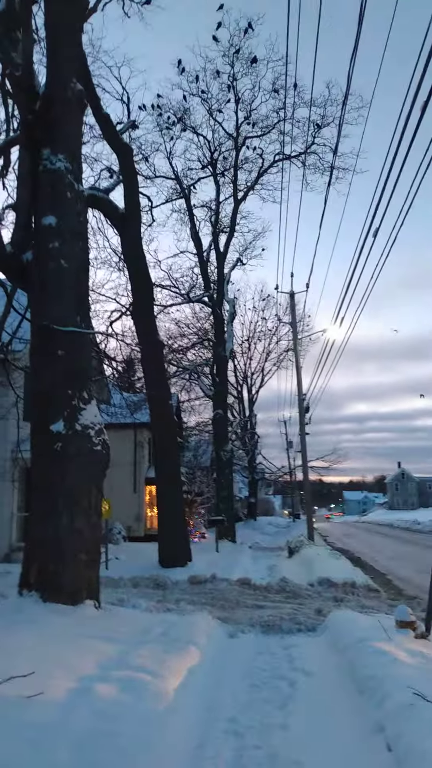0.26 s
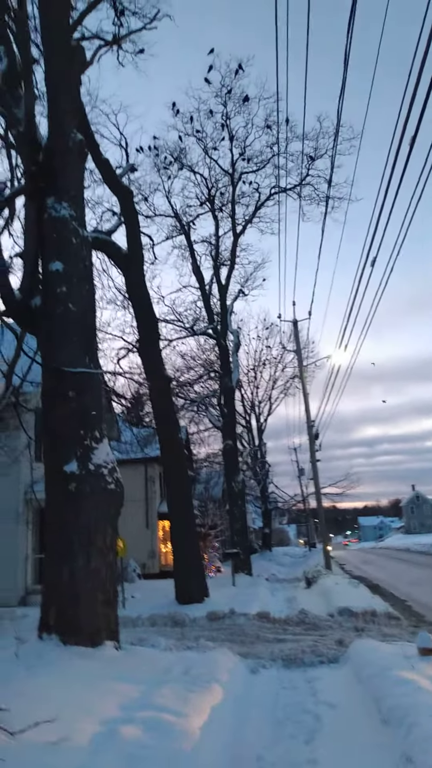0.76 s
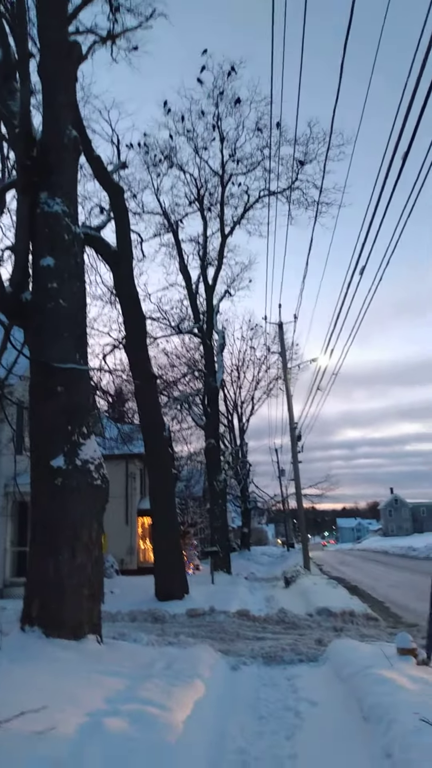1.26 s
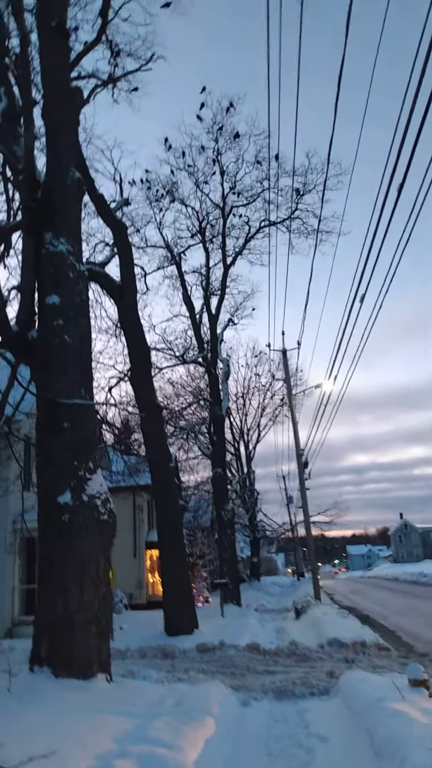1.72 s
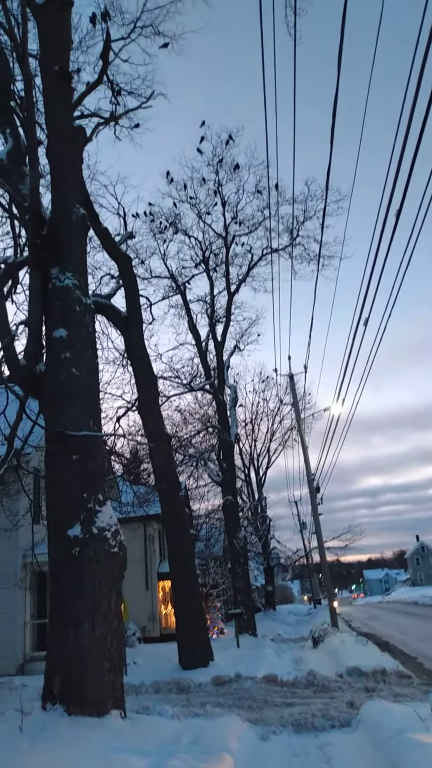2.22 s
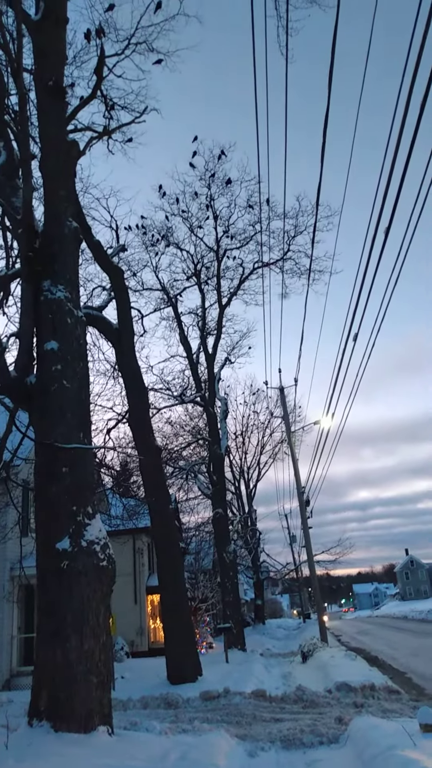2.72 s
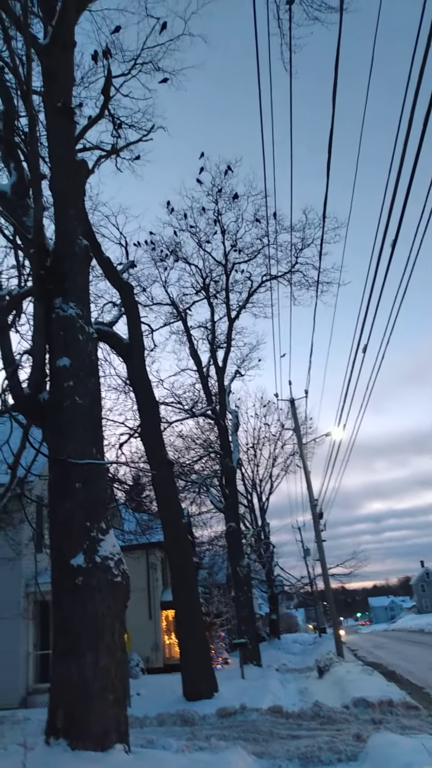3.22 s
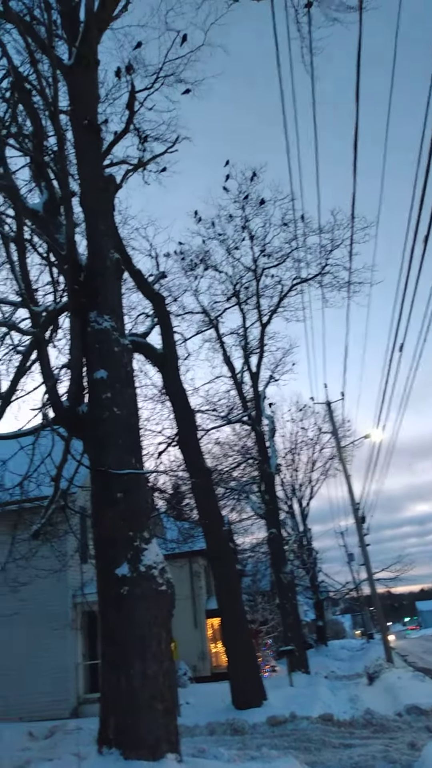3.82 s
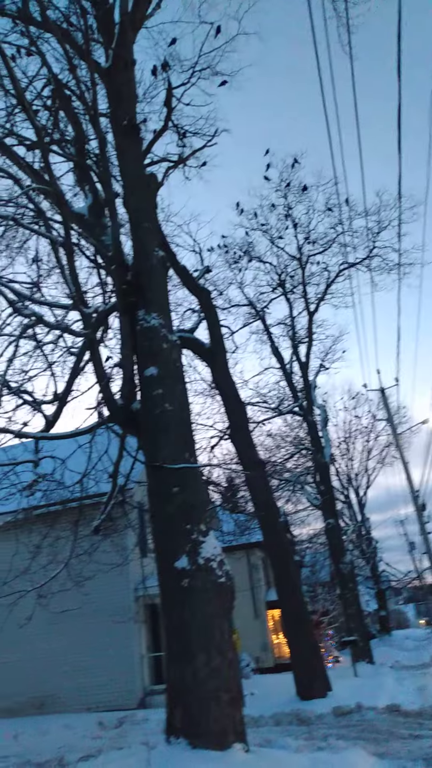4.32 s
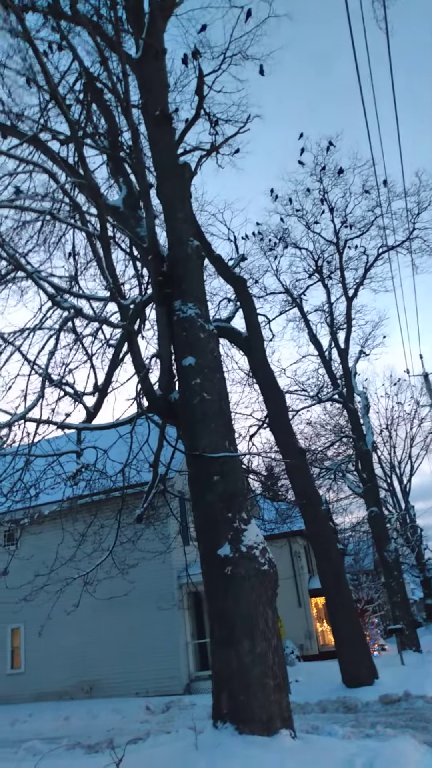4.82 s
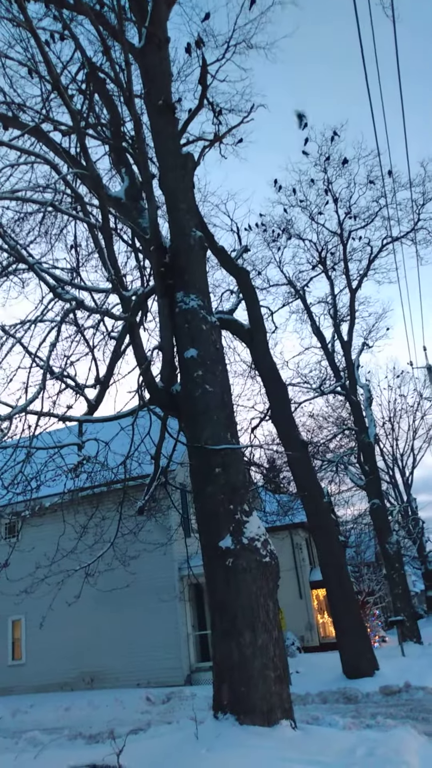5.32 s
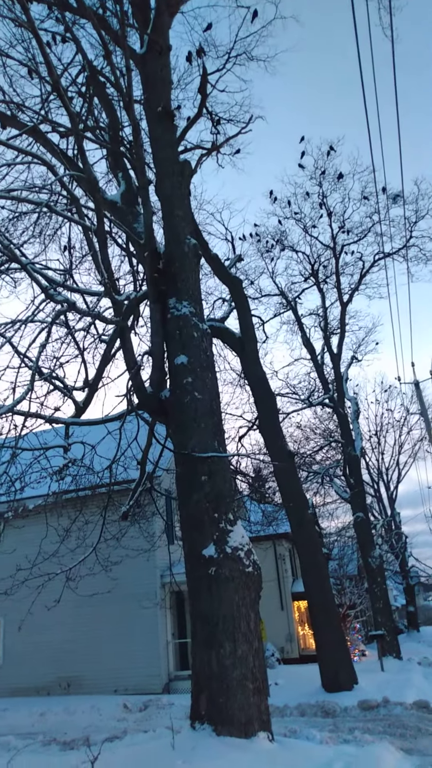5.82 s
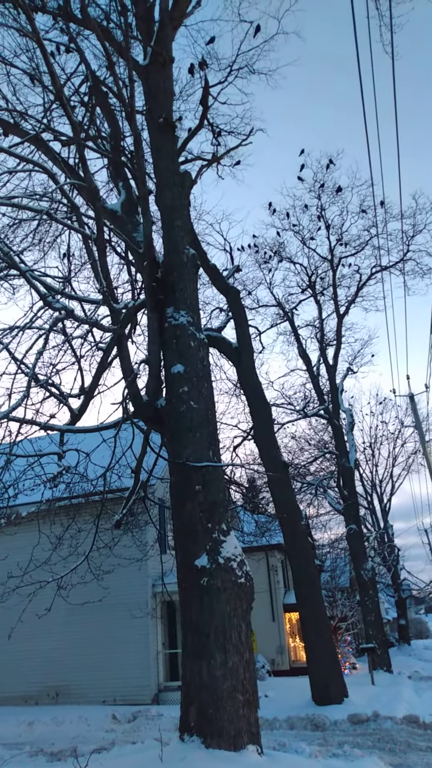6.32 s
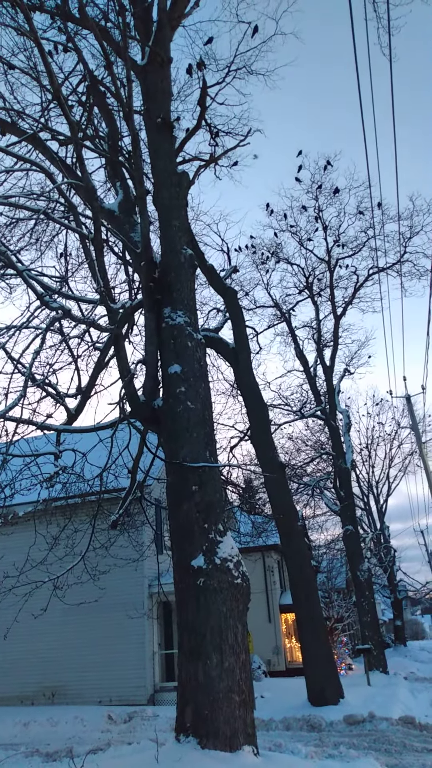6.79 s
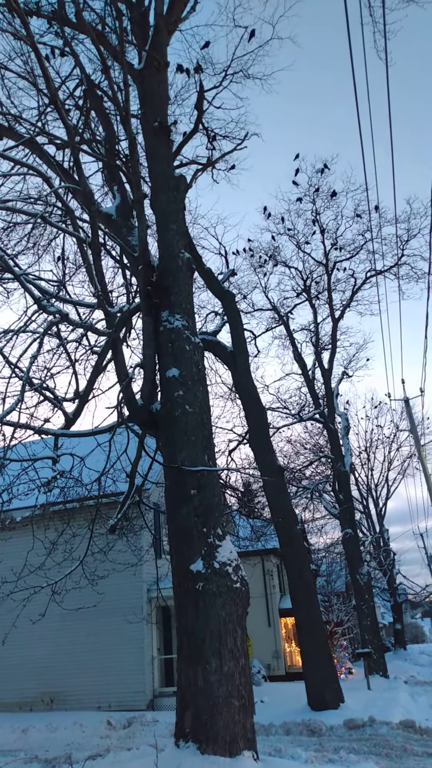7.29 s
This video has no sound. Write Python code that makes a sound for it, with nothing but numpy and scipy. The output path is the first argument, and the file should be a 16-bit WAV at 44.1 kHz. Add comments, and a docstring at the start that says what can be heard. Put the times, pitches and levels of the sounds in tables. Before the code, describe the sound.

A flock of crows in bare winter trees: first a distant blurred murmur under bassy wind thuds at the left, then quick harsh caws piling over each other for two seconds. After a brief lull, clear short caws repeat, answered by a closer rasping bird until the end. A tiny dry click comes late. Quiet far traffic hum, thin hiss, open air with short wall and tree echoes.

```python
"""Bare trees beside a snowy road: a flock of crows caws there, the calls overlapping in quick runs.
Each voice is a harmonic source with an arch of pitch and pulsed noise, filtered by throat and tone.
Delayed copies and decaying noise tails give the echoes of a house wall and the trees; a blurred
murmur of far crows lies behind. Filtered noise makes the gusts that buffet the left microphone port
in the first half, the wash and hum of far traffic and a thin hiss. One dry click comes near the end."""
import sys
import numpy as np
from scipy import signal
from scipy.fft import rfft, irfft, next_fast_len
from scipy.io import wavfile
from scipy.ndimage import map_coordinates

SR = 44100
rng = np.random.default_rng(int(sys.argv[2]) if len(sys.argv) > 2 else 0)


def master_out(mix):
    """Clip the mix to full scale and print it as 16-bit PCM to the path in sys.argv[1]."""
    frames = np.transpose(np.atleast_2d(mix))
    ceiling = np.clip(frames, -1, 1)
    pcm = np.round(ceiling * 32767).astype(np.int16)
    wavfile.write(sys.argv[1], SR, pcm)


N = 332955
TIME = np.arange(N) / SR


def gain_of(db):
    """Decibel law: 20 dB is a factor of ten in amplitude."""
    return 10 ** (np.asarray(db) / 20)


def evened(x):
    """Normalisation: scales a signal to an rms value of 1."""
    return x / np.sqrt(np.mean(x ** 2) + 1e-20)


def read(points, hz):
    """Interpolation: reads a table along a logarithmic frequency axis."""
    f, value = np.transpose(points)
    return np.interp(np.log(hz + 1), np.log(f + 1), value)


def level(rows):
    """Envelope: turns rows of (time [s], level [dB]) into a gain for every sample."""
    return gain_of(np.interp(TIME, *np.transpose(rows)))


def coloured(x, points):
    """Linear filtering: multiplies the spectrum by a response of (frequency [Hz], gain [dB])."""
    size = x.shape[-1]
    padded = next_fast_len(size)
    response = gain_of(read(points, np.fft.rfftfreq(padded, 1 / SR)))
    return irfft(rfft(x, padded) * response, padded)[..., :size]


def wander(size, rate_hz):
    """Band-limited randomness: a smooth curve through random points, of spread about 1."""
    at = np.arange(size) * rate_hz / SR
    return map_coordinates(rng.standard_normal(4096), [at], order=3, mode="grid-wrap")


def add(mix, s, sound):
    """Superposition: adds a sound to the mix from time s [s]."""
    part = mix[..., max(round(s * SR), 0):][..., :sound.shape[-1]]
    part += sound[..., :part.shape[-1]]


# Spectrum of the far traffic's wash: (frequency [Hz], relative density [dB per Hz])
WASH_SPECTRUM = [(30, -26), (140, .5), (230, 1.5), (340, -12), (550, -15.5), (1300, -13), (2200, -22.5),
                 (5000, -34), (15500, -37.5)]
WASH_DB = -64.5
# Spectrum of a far engine's hum: (frequency [Hz], relative density [dB per Hz])
HUM_SPECTRUM = [(100, -38), (180, 4), (205, 34), (235, 1), (400, -110.5)]
# Course of the hum before the left-right balance: (time [s], level [dB])
HUM_COURSE = [(1.5, -75), (3.8, -64), (7, -61.5), (7.3, -78)]
# Spectrum of the thin hiss: (frequency [Hz], relative density [dB per Hz])
HISS_SPECTRUM = [(10500, -28), (11500, -4.5), (11900, -25), (12250, 4.5), (12800, -2.5), (13200, -17),
                 (15700, -17.5)]
# Course of the hiss before the left-right balance: (time [s], level [dB])
HISS_COURSE = [(0, -70), (2, -65.5), (4, -61.3), (7.55, -61)]


def background(waver_db=1.2, shared=1.44, left_db=1, hum_right_db=-4, hiss_left_db=-10):
    """Partly coherent noise: traffic wash and wavering hum share both ports; hiss is mostly right."""
    noise = rng.standard_normal((2, N)) + shared * rng.standard_normal(N)
    wash = evened(coloured(noise, WASH_SPECTRUM)) * gain_of(WASH_DB)
    hum = evened(coloured(noise, HUM_SPECTRUM)) * level(HUM_COURSE)
    hum *= gain_of(waver_db * wander(N, 14))
    hiss = evened(coloured(rng.standard_normal((2, N)), HISS_SPECTRUM)) * level(HISS_COURSE)
    wash *= gain_of([[left_db], [0]])
    hum *= gain_of([[0], [hum_right_db]])
    hiss *= gain_of([[hiss_left_db], [2]])
    return wash + hum + hiss


# Dulled voice of the far flock: (frequency [Hz], gain [dB])
MURMUR_COLOUR = [(450, -20), (650, 0), (820, 0), (1100, -8), (1400, -15), (2000, -28), (2700, -18),
                 (3150, -33), (3600, -19), (4300, -35)]
# Course of the murmur at the left port: (time [s], level [dB])
MURMUR_COURSE = [(0, -64), (.3, -59.5), (1, -61.5), (3.7, -61), (4.6, -69.5), (6.5, -68), (7.5, -59)]
FAR_CAWS_PER_S, FAR_PITCH_HZ, FAR_LENGTH_S = 11, 725, .08


def far_flock(right_db=-7, spread=.07, sag=.15, shake=.07, uneven_db=3.5, t60=.28):
    """Diffusion: random far caws convolved with decaying noise blur to a murmur, more on the left."""
    calls = np.zeros(N)
    u = np.linspace(-1, 1, int(FAR_LENGTH_S * SR))  # start to end of one call
    draws = rng.standard_normal((int(FAR_CAWS_PER_S * N / SR), 3))
    for k, (when, pitch, size) in enumerate(draws):
        centre_hz = FAR_PITCH_HZ * (1 + spread * pitch)
        turns = np.cumsum(centre_hz * (1 - sag * u ** 2 + shake * wander(len(u), 200))) / SR
        buzz = sum(np.cos(2 * np.pi * h * turns) for h in range(1, 6))
        one_call = gain_of(uneven_db * size) * (1 - u ** 2) * buzz
        add(calls, (k + when / 2) / FAR_CAWS_PER_S, one_call)
    t = np.arange(SR // 2) / SR
    blur = rng.standard_normal((2, len(t))) + rng.standard_normal(len(t))
    blur *= gain_of(-60 * t / t60)
    murmur = coloured(signal.fftconvolve(calls[None], blur, axes=1)[:, :N], MURMUR_COLOUR)
    return evened(murmur) * level(MURMUR_COURSE) * gain_of([[0], [right_db]])


# Spectrum of the wind's turbulence: (frequency [Hz], relative gain [dB])
TURBULENCE_SPECTRUM = [(20, -31), (50, -3), (90, 0.5), (150, -1.5), (250, -10.5), (400, -25), (800, -42),
                       (6000, -76)]
# Gusts at the left port: (time of the peak [s], time to fall by 20 dB [s], level [dB])
GUST_PEAKS = [(.3, 0.61, -45), (.64, 0.41, -40), (.96, 0.13, -40), (1.13, .2, -41), (1.7, .8, -60),
              (2.88, 0.14, -52), (3.17, 0.18, -49.5), (3.34, 0.28, -47)]
# Pressure kicks at the left port, and one soft crunch at 1.71 s: (time of the peak [s], pitch [Hz], peak level
# [dB])
PRESSURE_KICKS = [(.598, 122, -17), (.656, 135, -14.5), (.678, 220, -23), (.961, 114, -24.5),
                  (1.125, 102, -24), (1.147, 81, -25.5), (1.71, 320, -39), (2.882, 124, -34.5),
                  (3.341, 191, -17)]
GUST_RISE = 0.57  # rise time of a gust as a share of its fall time
BREEZE_DB = -72  # the light air between gusts
KICK_CYCLES = 0.7  # half the length of a kick, in cycles of its pitch


def wind(lumps_db=3.2, right_db=-22):
    """Turbulent pressure: gusts swell and die exponentially, with short kicks and a soft crunch, nearly all at
    the left."""
    strength = gain_of(BREEZE_DB)
    for s, fall, db in GUST_PEAKS:
        away = np.maximum((TIME - s) / fall, (s - TIME) / (GUST_RISE * fall))
        strength = strength + gain_of(db - 20 * away)
    turbulence = evened(coloured(rng.standard_normal((2, N)), TURBULENCE_SPECTRUM))
    rumble = turbulence * strength * gain_of(lumps_db * wander(N, 30))
    for s, hz, db in PRESSURE_KICKS:
        width = KICK_CYCLES / hz
        t = np.arange(-3 * width, 3 * width, 1 / SR)
        kick = np.exp(-(t / width) ** 2) * np.cos(2 * np.pi * hz * t)
        add(rumble, s + t[0], gain_of(db) * kick)
    return rumble * gain_of([[0], [right_db]])


# The throat holds back the fundamental: (frequency [Hz], gain [dB])
THROAT_RESPONSE = [(500, -50), (740, -31), (950, -9), (1100, 0), (11000, 0), (14000, -22)]
# Random shake and regular quiver scale with roughness (shares of the pitch); rate of the quiver
JITTER, QUIVER, QUIVER_HZ = .025, .052, 47
DRIFT = .011  # slow bend that differs in each caw (share of the pitch)
RASP_DB = 8.7  # the pulsed air against one harmonic


def caw(length, top_hz, arch, early, flat, rough, hiss_hz, tone, ease=1.45, flutter=.2, edge_db=36,
        uneven_db=3.2, swell=.45, throb_db=6.5, attack=.016, release=.025):
    """Source-filter principle: syrinx harmonics and pulsed air above them pass the throat and a tone."""
    t = np.arange(int(length * SR)) / SR
    u = 2 * t / length - 1  # -1 at the start, 1 at the end
    bend = arch * abs(np.sin(ease * (u + early) / (1 + abs(early))) / np.sin(ease)) ** abs(flat)

    # the voice breaks up more toward the end of the call
    harsh = rough * (1 + u / 2)
    quiver = np.sin(2 * np.pi * (QUIVER_HZ * t + rng.random()) + wander(len(t), 40) / 2)
    shake = rough * QUIVER * quiver
    shake += harsh * JITTER * (wander(len(t), 130) + wander(len(t), 700))
    shake += DRIFT * wander(len(t), 25)
    turns = np.cumsum(top_hz * (1 - bend) * (1 + shake)) / SR

    # upper harmonics and rasp peak in mid-call, with the beak wide open
    opening = gain_of(edge_db * (1 - rough) ** 2 * (1 / 5 - u ** 2))
    buzz = np.zeros(len(t))
    for k in range(1, 19):
        harmonic = np.cos(2 * np.pi * k * turns + k * k / 2)
        if k > 2:
            harmonic *= opening * gain_of(uneven_db * wander(len(t), 34.4))
        buzz += harmonic / np.hypot(1, (k * top_hz / hiss_hz) ** 2)

    air = (1 + np.cos(2 * np.pi * turns)) * rng.standard_normal(len(t))
    air *= gain_of(throb_db * rough * quiver) * opening
    air = signal.lfilter(*signal.butter(2, min(hiss_hz, SR / 3), "high", fs=SR), air)

    drive = buzz + gain_of(RASP_DB) * air
    drive *= np.maximum(1 - u ** 2, 0) ** abs(swell)
    drive *= np.exp(flutter * rough * wander(len(t), 600))
    drive *= np.minimum(1, np.minimum(t / attack, (length - t) / release))
    voice = coloured(np.pad(drive, (0, 1024)), THROAT_RESPONSE)
    # the lower band alone sets the loudness, whatever the tone is above it
    body = coloured(voice, [(1550, 0), (1750, -60)])
    return coloured(voice, tone) / np.std(body[:len(t)])


# Low tones lead by less: (frequency [Hz], share of the lead [0-1])
LEAD_BY_PITCH = [(1300, .77), (2000, .97), (3500, 1)]


def ports(x, lead):
    """Interaural delay: a phase advance lets the left port hear the sound up to lead [s] earlier."""
    padded = next_fast_len(len(x) + 512)
    hz = np.fft.rfftfreq(padded, 1 / SR)
    advance = np.exp(2j * np.pi * hz * lead * read(LEAD_BY_PITCH, hz))
    return np.array([irfft(rfft(x, padded) * advance, padded)[:len(x)], x])


# Reverberation of the trees where the echo is -7 dB: (frequency [Hz], t60 [s])
TREE_DECAY = [(1300, .48), (5000, .39), (10000, .34)]
# Echoes of house and nearby trunks, before each perch shifts them: (delay [s], level [dB])
WALL_ECHOES = [(.011, -11), (.028, -11), (.056, -6), (.08, -13)]
# Branch scatter and long tail against the direct sound, before each perch's echo level
NEAR_DB, TREES_DB = -8, -5


def surroundings(call, echo_db, lead, near_t60=0.18, onset=0.034, reach=0.065):
    """Reflection and scattering: wall echoes, short scatter and a tail that lengthens with echo level."""
    size = SR * 3 // 4
    hz, t, z = signal.stft(rng.standard_normal((2, size)), SR, nperseg=256)
    t60 = read(TREE_DECAY, hz)[:, None] * np.exp(reach * (echo_db + 7))
    decay = gain_of(-60 * t / t60) * (1 - np.exp(-t / onset))
    far = signal.istft(z * decay, SR, nperseg=256)[1][:, :size]

    t = np.arange(size) / SR
    near = rng.standard_normal((2, size)) * gain_of(-60 * t / near_t60) * (1 - np.exp(-t / onset))

    paths = np.zeros(size)
    paths[0] = 1  # the direct sound
    for delay, db in WALL_ECHOES:
        add(paths, delay * rng.uniform(.85, 1.15), gain_of([db + echo_db / 2]))

    diffuse = gain_of(TREES_DB + echo_db) * evened(far)
    diffuse += gain_of(NEAR_DB + echo_db / 2) * evened(near)
    # thin twigs scatter the short waves most
    diffuse = coloured(diffuse / np.sqrt(size), [(1500, -3), (4500, 3)])
    direct = ports(signal.fftconvolve(call, paths), lead)
    return direct + signal.fftconvolve(call[None], diffuse, axes=1)


# Each voice repeats one kind of caw from its own perch: (length [s], pitch sag at the ends [share],
# earliness of the top [0-1], flatness of the top [exponent], roughness [0-1],
# harmonics turn to hiss above [Hz], echo [dB], lead at the left port [s])
VOICE_SETTINGS = { "raucous": (.15, .27, .08, 1.8, .62, 6200, -9, .00043),
                  "strident": (.152, .26, .06, 1.8, .39, 8000, -10, .00054),
                  "clear": (.112, .16, 0, 3.2, .15, 13000, -18, .00028),
                  "hoarse": (.16, .24, .2, 1.8, .55, 5000, -1, .00031),
                  "shrill": (.14, .2, .05, 1.8, .55, 4400, -1, .00013),
                  "dull": (.125, .21, .2, 1.8, .42, 5500, -4, .00029),
                  "distant": (.108, .14, .2, 1.8, .25, 6000, -5, .00003),
                  "thin": (.125, .1, 0, 3, .1, 16000, -12, .00028)}
# Tone of each voice in the upper bands: (frequency [Hz], gain [dB])
VOICE_TONES = { "raucous": [(1600, -1), (2230, -11), (2440, -50), (2540, -44), (2760, -14), (3550, -9),
               (3850, -17), (4550, -5.5), (5300, -15), (6700, -19), (8800, -13.5), (10500, -21),
               (12000, -36)], "strident": [(1500, 0), (1750, -9), (2250, -9.5), (2430, -46), (2700, -44),
               (2980, -23), (3700, -13), (4400, -9), (5300, -17), (6600, -22), (9000, -18), (12000, -38)],
               "clear": [(1500, 0), (1750, -29), (2500, -46), (3200, -46), (3450, -19), (4100, -26),
               (4900, -16), (5600, -15), (6300, -33), (8300, -24), (12000, -39)], "hoarse": [(1450, 0),
               (2050, -16), (2400, -42), (2700, -27), (2950, -50), (3350, -18), (3720, -38), (4000, -19),
               (4250, -32), (4600, -7), (5800, -15), (8400, -25), (9500, -52)], "shrill": [(1450, 0),
               (2050, -15), (2480, -46), (2750, -23), (3400, -14), (3750, -24), (4500, -10), (6600, -22),
               (9000, -19), (11500, -40)], "dull": [(1450, 0), (2050, -19), (2400, -42), (2700, -28),
               (2950, -50), (3400, -22), (3720, -38), (4600, -17), (9500, -41)], "distant": [(1500, 0),
               (1750, -39), (3600, -42), (6000, -56)], "thin": [(1500, 0), (1900, -24), (4700, -26),
               (5700, -6), (6700, -28), (8100, -9), (9000, -30)]}


def perched(voice, top_hz, db):
    """Source and path: one caw in its bird's voice, carried through the surroundings of its perch."""
    length, arch, early, flat, rough, hiss_hz, echo_db, lead = VOICE_SETTINGS[voice]
    tone = VOICE_TONES[voice]
    call = caw(length, top_hz, arch, early, flat, np.clip(rough, 0, 1), hiss_hz, tone)
    return surroundings(gain_of(db) * call, echo_db, lead)


# The leading caws, level before echoes and port balance: (time [s], voice, top pitch [Hz], level [dB])
LEADING_CAWS = [ (.067, "distant", 620, -59), (.505, "distant", 650, -44.5), (.64, "distant", 690, -60),
                (1.016, "distant", 655, -45), (1.113, "distant", 658, -43), (1.215, "hoarse", 643, -37),
                (1.387, "dull", 680, -37), (1.564, "distant", 660, -41), (1.673, "hoarse", 665, -36.5),
                (1.781, "shrill", 645, -34.5), (1.884, "dull", 662, -37), (1.96, "distant", 650, -41),
                (2.09, "dull", 680, -34), (2.14, "hoarse", 644, -39.5), (2.317, "shrill", 642, -35.5),
                (2.481, "dull", 672, -34.5), (2.605, "raucous", 765, -32.5), (2.63, "distant", 645, -37),
                (2.74, "dull", 645, -41), (2.855, "shrill", 670, -38), (2.878, "dull", 648, -32),
                (2.954, "raucous", 760, -33.5), (3.105, "hoarse", 646, -41), (3.12, "distant", 648, -37),
                (3.265, "dull", 667, -33), (3.309, "raucous", 745, -32), (3.451, "shrill", 647, -37),
                (3.635, "dull", 647, -34), (3.669, "raucous", 742, -32), (3.975, "distant", 645, -54),
                (4.066, "raucous", 728, -32), (4.509, "distant", 639, -56), (4.755, "thin", 730, -65),
                (5.1, "thin", 725, -63), (5.185, "clear", 706, -40), (5.476, "clear", 692, -39.5),
                (5.793, "clear", 700, -40), (6.104, "clear", 706, -38.5), (6.2, "strident", 738, -32),
                (6.518, "strident", 748, -32.5), (6.665, "dull", 675, -41), (6.847, "strident", 742, -32.5),
                (7.071, "dull", 680, -39), (7.2, "strident", 740, -32)]
# Scattered birds join in while the flock is excited:
# (from [s], to [s], rate [calls per s], middle of the top pitches [Hz], level [dB])
JOINING_BIRDS = (1.7, 3.6, 5, 700, -45)
# The left port hears the crows mostly fainter: (frequency [Hz], left minus right [dB])
LEFT_BALANCE = [(750, 7), (1200, -6), (2000, -11), (3500, -5.5), (4800, -7), (6200, 0), (9000, -2)]


def crows(spread=.07):
    """Superposition of sources: leading caws are crossed by others that join at random pitches."""
    mix = np.zeros((2, N))
    for s, *call in LEADING_CAWS:
        add(mix, s, perched(*call))
    start, end, per_s, hz, db = JOINING_BIRDS
    for s in np.arange(start, end, 1 / per_s):
        top_hz = hz * (1 + spread * rng.uniform(-1, 1))
        add(mix, s + rng.random() / per_s / 2, perched("dull", top_hz, db))
    return np.array([coloured(mix[0], LEFT_BALANCE), mix[1]])


def tick(s=6.766, db=-44, t60=.035):
    """Impulsive sound: one small dry click of filtered noise with a fast exponential decay."""
    mix = np.zeros((2, N))
    t = np.arange(SR // 10) / SR
    noise = coloured(rng.standard_normal((2, len(t))), [(1500, -22), (3500, 3), (15000, -8)])
    add(mix, s, gain_of(db - 60 * t / t60) * evened(noise))
    return mix


def scene():
    """Linear superposition: background, far flock, wind, crows and click add up at the two ports."""
    return background() + far_flock() + wind() + crows() + tick()


EDGE_HZ = 15800


def record(dry):
    """Band limitation: the recorder's linear-phase low-pass removes everything well above its edge."""
    low_pass = signal.firwin(511, EDGE_HZ, window=("kaiser", 9), fs=SR)
    return signal.oaconvolve(dry, low_pass[None], "same")


dry = scene()
out = record(dry)
master_out(out)
```